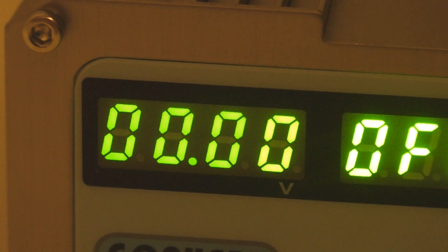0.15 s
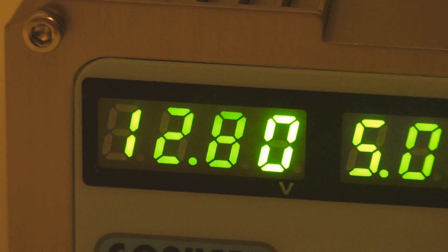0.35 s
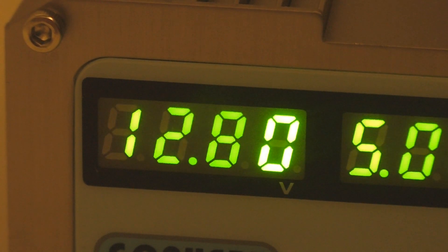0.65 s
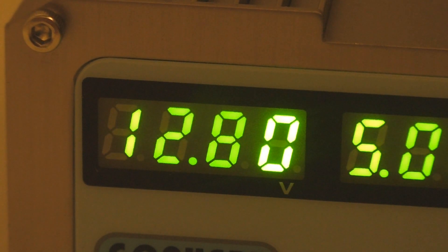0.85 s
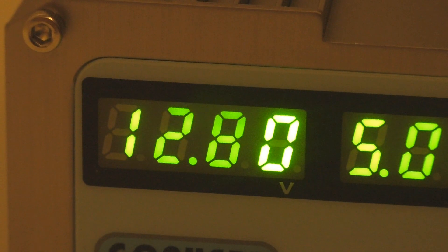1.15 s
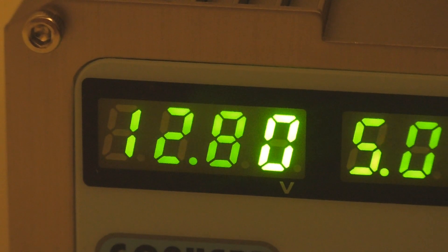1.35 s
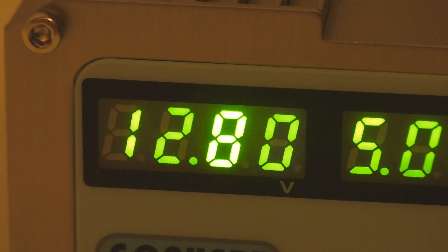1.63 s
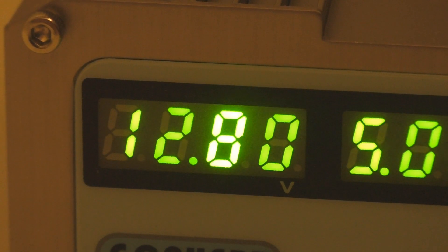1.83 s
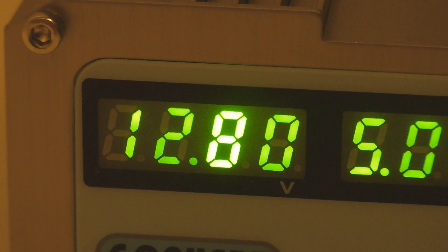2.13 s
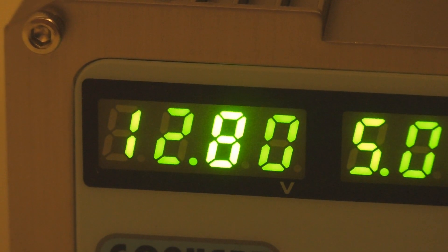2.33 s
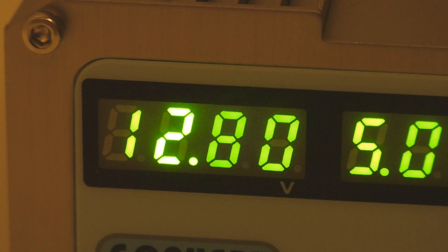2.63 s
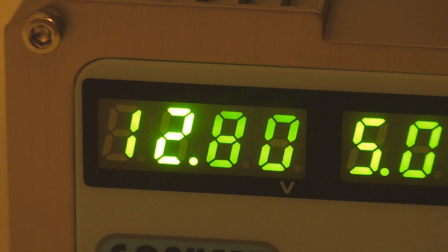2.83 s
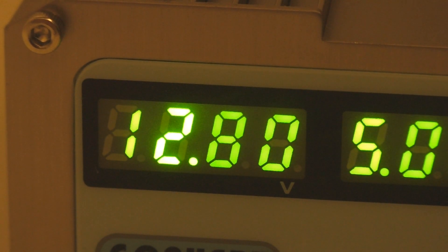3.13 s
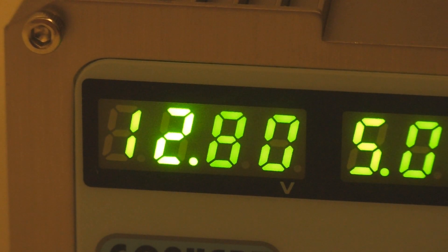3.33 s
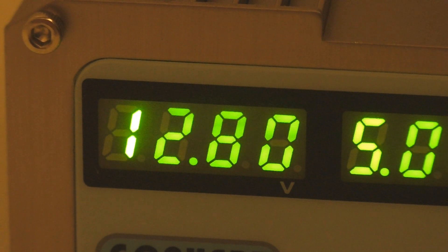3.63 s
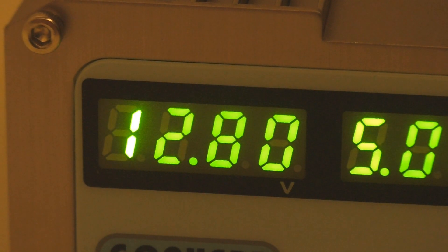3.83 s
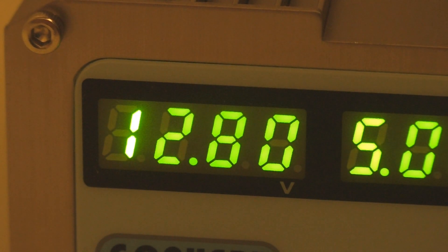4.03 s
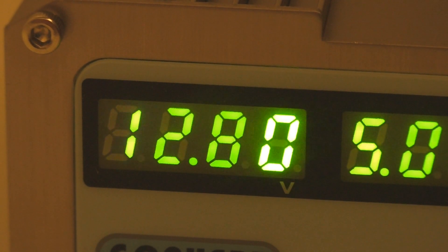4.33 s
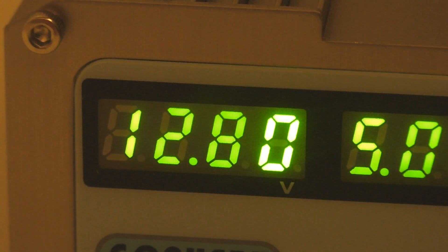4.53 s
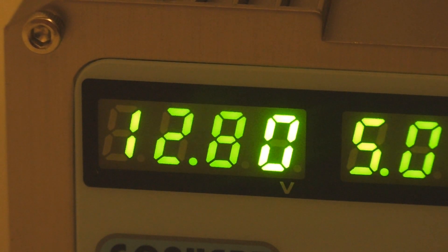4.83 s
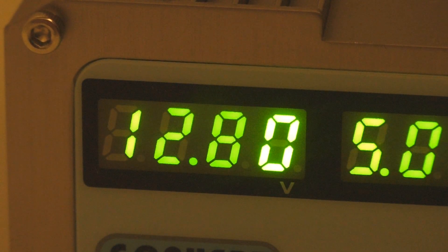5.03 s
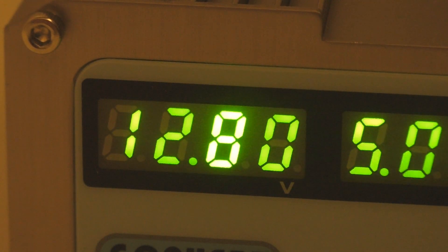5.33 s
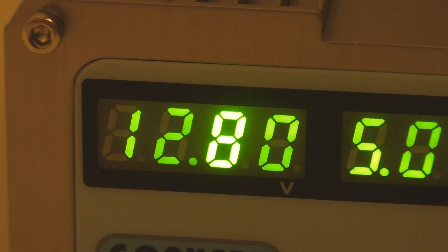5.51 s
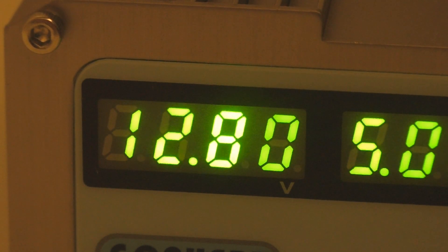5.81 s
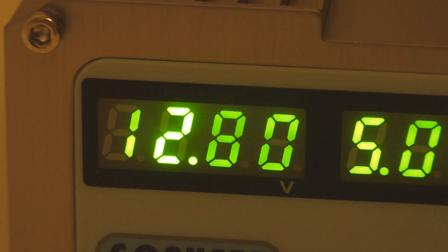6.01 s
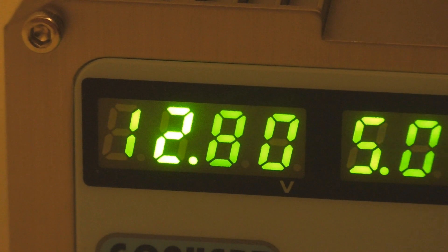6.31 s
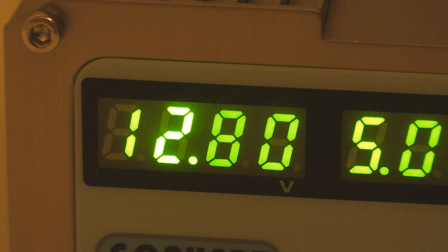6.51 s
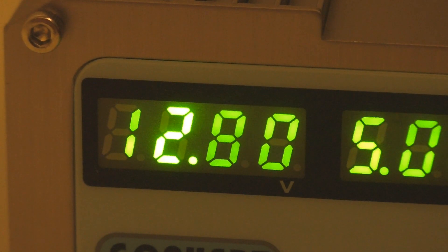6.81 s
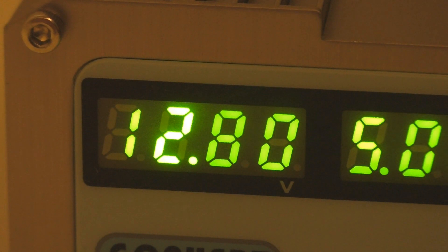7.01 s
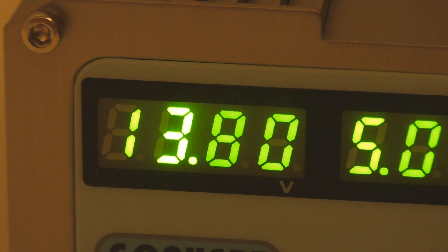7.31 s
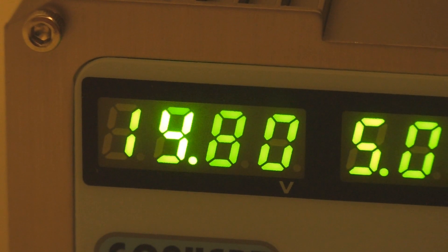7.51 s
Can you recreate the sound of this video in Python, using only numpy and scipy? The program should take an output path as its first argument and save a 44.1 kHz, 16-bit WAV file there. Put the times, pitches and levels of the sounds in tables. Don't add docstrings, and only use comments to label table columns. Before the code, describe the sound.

Seven evenly spaced button presses, each a bright sharp click followed by a softer, duller release knock, close up in a quiet room with faint fan rumble.

```python
import sys
import numpy as np
from scipy import signal
from scipy.fft import rfft, irfft
from scipy.io import wavfile
from scipy.ndimage import uniform_filter1d

SR = 44100
rng = np.random.default_rng(int(sys.argv[2]) if len(sys.argv) > 2 else 0)


def boost_factor(decibels):
    exponent = np.asarray(decibels, float) / 20
    return 10 ** exponent


def transcribe(u):
    v = np.clip(np.atleast_2d(u).T, -1, 1)
    q = np.round(v * 32767).astype(np.int16)
    wavfile.write(sys.argv[1], SR, q)


N = 337850

# f/Hz, density/dB
HISS = [(290, -44), (500, -26.5), (603, -23), (630, -8), (749, -2), (865, -3), (1470, 1), (1800, -2.5),
        (2440, -5.5), (2660, -5.5), (5800, -19.5), (7300, -21.5), (10000, -14), (15700, -13)]
HISS_DB = -63
# f/Hz, likeness/0..1
SIDE_LIKENESS = [(60, 0.74), (130, 0.98), (290, 0.39), (640, 0.97), (1410, 0.11), (3100, 0.086),
                 (6820, 0.51), (11000, 0.62), (15000, 0.25)]
# f/Hz, width/Hz,
# level against the hiss at start/dB, rise/dB per s
NARROW_BANDS = [(590, 30, -3, -1), (744, 40, -1, 0.92), (827, 49, -7.5, 0.26)]
# f/Hz, density/dB
DEEP_AIR = [(15, -0.5), (27, -6), (38, -6), (50, -9), (62, 0.5), (80, -11), (200, -65)]
DEEP_AIR_DB = -62.5
# f/Hz, width/Hz, level/dB
ROOM_BOOMS = [(94.2, 8.6, 2), (121.6, 9.8, 1.5), (144, 35.7, 1), (369, 153, -0.5), (240.4, 75, 0.5),
              (27, 6.4, -8.5)]
CALM_DB = [-62.5, -60.5, -58.5, -65.5, -65.5, -67.5]
WARMING_DB_PER_S = [0.022, 0.096, 0.39, 0.56, 0.39, 0.43]
WAVER_DB = [1.5, 1.16, 1.4, 0.56, 0.9, 1.8]
# t/s, f/Hz, level over calm/dB, length/s
SURGES = [(0.05, 95, 7, 1), (0.493, 95, 8, 0.32), (1.0, 95, 5.5, 0.35), (1.238, 95, 14, 0.24),
          (1.736, 95, 16, 0.16), (4.748, 95, 10, 0.25), (2.58, 95, 6, 0.41), (3.57, 95, 11, 0.26),
          (4.462, 95, 6, .3), (5.2, 95, 14.5, 0.26), (5.72, 95, 6, 0.21), (6.538, 95, 4.5, 0.36),
          (7.212, 95, 8.5, 0.23), (7.602, 95, 8, 0.45), (0.657, 95, 12.5, 0.19), (0.942, 121, 2.5, 0.22),
          (1.41, 121, 8.5, 0.48), (1.924, 121, 11, 0.44), (2.606, 121, 14.5, 0.27), (3.065, 121, 7.5, 0.52),
          (3.485, 121, 6.5, 0.15), (3.803, 121, 10, 0.37), (4.512, 121, 10.5, 0.54),
          (5.248, 121, 11.5, 0.32), (5.66, 121, 13, 0.56), (6.115, 121, 8.5, 0.53), (6.65, 121, 12, 0.73),
          (7.36, 121, 2, 0.36), (1.277, 146, 5, 0.33), (2.438, 146, 8, 0.18), (2.8, 146, 2.5, .45),
          (5.4, 369, -1.5, .3), (5.4, 241, -1, 0.27), (4.7, 146, 6, 0.65), (5.9, 146, 3.5, 0.34),
          (6.4, 146, 3.5, .4), (3.3, 146, -2, .4), (0.1, 146, 1, .3), (0.75, 241, 3.5, 0.37),
          (4.7, 241, 4, 0.45), (6.298, 241, 4, 0.37), (7.0, 241, -2.5, 0.36), (6.3, 369, 2, 0.68),
          (7.05, 369, -2.5, .5), (4.5, 369, 0.5, .4), (3.3, 121, 0, .25)]
# t/s, length/s, f/Hz, peak level/dB
SQUEAKS = [
    (5.81, 0.057, 9260, -65),
    (5.84, .08, 9400, -81),
    (7.539, 0.11, 8660, -60),
    (7.59, 0.056, 9260, -71),
    (7.625, 0.035, 8700, -70),
]
# length/s, level/dB, low f/Hz, high f/Hz
SCRAPE = (0.14, -66, 1200, 4500)
SCRAPE_S = 6.09
# f/Hz, t60/s, level/dB, build-up/s
FLICK_MODES = [(1567, .052, -5, .0005), (2213, 0.042, 2, .0005), (3203, 0.092, -11, .004),
               (3500, 0.034, -1, .0005), (4870, .03, -12, .0005)]
FLICK_S, FLICK_DB = 5.9807, -43.5
# f/Hz, t60/s, level/dB, build-up/s
DETENT_MODES = [(980, 0.092, -9, .002), (1510, 0.16, -2, .002), (2080, .07, 1, .001),
                (2850, 0.076, 1, .001), (3200, 0.078, -3, .001), (4430, 0.098, -6, .0006),
                (5900, 0.071, -5, .0004), (7500, 0.051, -6, .0004), (7876, .052, -7, .0004),
                (9600, .03, -7, .0004), (12000, .025, -8, .0004)]
DETENT_S, DETENT_DB = 6.2142, -51.5
# t/s, f/Hz, level/dB, t60/s
THUDS = [(2, 179, -45, 0.16), (1.22, 249, -45.5, 0.15), (1.39, 205, -42.5, 0.15), (5.375, 195, -42, .12),
         (5.543, 196, -48, .12), (6.16, 252, -45.5, 0.22), (5.4, 312, -43, 0.12), (5.3, 403, -47, 0.087),
         (6.64, 760, -60, .15), (7.61, 300, -49, 0.15), (4.94, 97, -42, 0.34), (1.55, 94, -48, .25),
         (4.62, 140, -44.5, 0.34), (5.521, 180, -45, .15), (2.19, 100, -45, 0.25), (1.53, 98, -37, 0.2),
         (7.2, 220, -51, 0.24), (7.4, 250, -53, 0.18)]
TICK_S = [1.591, 1.592, 1.593, 1.593, 1.87, 3.15, 3.613, 5.981, 5.982, 5.982, 6.005, 6.075, 6.079, 6.157,
          6.158, 6.162, 6.166, 6.19, 6.2142, 6.215, 6.222, 6.232, 7.129, 7.18, 7.2365]
# peak level/dB, low f/Hz, high f/Hz, t60/s
TICKS = [(-60, 3400, 4900, .07), (-51, 860, 1700, .072), (-64, 7000, 8200, .09), (-67, 5200, 5800, .07),
         (-61.5, 1700, 2300, 0.16), (-67, 3000, 8000, .08), (-65, 3000, 4000, .05), (-60, 900, 6800, .1),
         (-53, 1900, 2430, .1), (-53, 3100, 3900, .1), (-62, 2000, 4500, .06), (-67, 7560, 12000, .066),
         (-64, 1500, 4500, .045), (-61, 3500, 13000, .23), (-58, 1100, 2600, .15), (-61, 8000, 13000, .08),
         (-63, 2500, 5000, .09), (-59, 3200, 13000, .11), (-50, 1200, 3980, .12), (-50.5, 3700, 11400, .09),
         (-57, 2000, 6000, .06), (-59, 1800, 5500, .09), (-64, 1200, 2000, .06), (-63, 1400, 3000, .05),
         (-56, 1300, 2100, .06)]
# delay/s, level/dB, low f/Hz, high f/Hz
ECHOES = [(0.0113, -16, 1850, 2700), (0.0108, -30, 4600, 6500), (0.0155, -21.5, 2400, 4500),
          (0.0215, -30, 1040, 1400), (0.029, -34, 910, 2700)]
# f/Hz, t60/s
TAIL_T60 = [(200, 0.29), (600, 0.14), (1500, 0.19), (4000, 0.16), (10000, 0.033)]

# t/s, peak level/dB
PRESSES = [(0.21198, -13), (1.50936, -12.2), (2.43441, -13.3), (3.3092, -12.5), (4.21068, -13),
           (4.92093, -12.6), (5.66695, -12.8)]
# buzz level/dB, crackle level/dB
SHAKES = [(-2, -0.5), (-4, 1.5), (2, 0), (1, -2.5), (5, -0.5), (0.5, -1.5), (1.5, 0.5)]
# f/Hz, t60/s, left and right swing/thousandths (sign = first direction)
SNAP_MODES = [(245, 0.22, -5.1, -5.2), (394, 0.22, 6.3, 9.1), (454, 0.22, -9.8, -9.2),
              (504, 0.033, 9.9, 15.1), (692, 0.042, 25.9, 33.1), (1090, 0.041, 56.7, 50.6),
              (1151, 0.105, -19.6, -10.0), (1218, 0.22, -3.4, -4.3), (1310, 0.215, -11.4, -5.6),
              (1340, 0.03, -232.5, -185.7), (1455, 0.055, -34.3, -14.4), (1543, 0.139, 11.8, 13.2),
              (1627, 0.01, 463.7, 388.0), (1758, 0.01, -301.8, -239.3), (1904, 0.074, -29.4, -22.7),
              (2049, 0.153, -4.9, -4.7), (2249, 0.019, -108.8, -116.5), (2397, 0.123, 7.4, 7.7),
              (2534, 0.105, -3.6, -9.7), (2624, 0.076, -19.0, -13.6), (2872, 0.019, -16.9, -13.6),
              (2971, 0.136, 1.5, 2.3), (3157, 0.034, 3.9, 14.2), (3295, 0.03, 25.5, 16.4),
              (3357, 0.042, -19.8, -12.0), (3710, 0.023, -9.1, -5.1), (3963, 0.015, -15.7, -19.8),
              (4362, 0.09, -2.0, -2.2), (4770, 0.128, 0.7, 0.7), (5014, 0.22, 0.4, 0.4)]
SNAP_RISE_S = 0.000082
# f/Hz, t60/s, level under the snap/dB, build-up/s
BENCH_MODES = [(243.8, 0.14, -22, 0.0039), (459, 0.1, -27.5, 0.011), (296, 0.16, -29, 0.015),
               (376.3, 0.11, -21, 0.0057), (630, 0.058, -26.5, 0.0021), (1275, 0.12, -29, .006),
               (1520, 0.064, -34, 0.0066), (1110, 0.37, -44, .02), (1690, 0.32, -41, .015),
               (2394, 0.09, -35, 0.0056), (3308, 0.063, -35.5, 0.0047), (5300, 0.048, -37.5, 0.001)]
# f/Hz, width/Hz, t60/s, level/dB, build-up/s
SNAP_BUZZ = [(2310, 250, 0.11, -27.5, .006), (3310, 170, .13, -36, 0.0044), (4820, 130, 0.16, -41, .007),
             (5120, 150, 0.13, -44, .008), (2900, 250, .08, -36, .004), (1950, 270, 0.083, -31, .008),
             (1360, 210, .15, -35, .006)]
# f/Hz, density/dB
TOUCH_COLOUR = [(2500, -19), (4000, -6), (6000, -0.5), (9000, -2.5), (12000, -3), (15000, -15)]
TOUCH_LEAD_S, TOUCH_DB = .00045, -34
# f/Hz, density/dB
SNAP_CRACKLE = [(3060, -1.5), (3500, 0.5), (3800, -4), (4300, 0.5), (5200, -4.5), (5700, -7.5), (7260, -7),
                (9000, -9.5), (11500, -12), (14300, -27), (16000, -25)]
SNAP_CRACKLE_DB = -37.5
# f/Hz, density/dB
SNAP_TAIL = [(350, -10.5), (600, 1), (791, -12), (1200, 0), (1590, 1), (1920, -4.5), (2380, -2.5),
             (2910, -25), (3260, -12), (5660, -21), (12000, -32), (15600, -70), (22000, -120)]

RELEASE_S = [0.40811, 1.71114, 2.64848, 3.55191, 4.40916, 5.14734, 5.93071]
# peak/dB, sharpness of 1.2 kHz modes/dB, edge of 1.9 kHz modes/dB, thump/dB, crackle/dB
RELEASES = [(-26, -5.5, 1, -15.5, -42.5), (-26.5, -10, -0.5, -16, -53), (-27.5, -15.5, 3, -15.5, -49.5),
            (-28, -13.5, 0, -13.5, -55), (-27, -13, 1, -14, -55), (-27, -6, 0.2, -17, -55),
            (-27, -15.5, 2, -15.5, -55.5)]
CAP_DB = [-46, -59, -48, -57, -58, -52, -57]
# f/Hz, t60/s, left and right swing/thousandths (sign = first direction)
KNOCK_MODES = [(90, 0.22, 12.6, 12.3), (145, 0.22, -9.3, -7.9), (235, 0.123, -19.7, -20.3),
               (296, 0.22, 7.2, 7.8), (379, 0.059, 45.7, 52.0), (450, 0.22, -12.1, -9.6),
               (521, 0.22, 2.8, 2.0), (665, 0.083, 12.8, 14.8), (693, 0.056, 26.4, 28.2),
               (779, 0.013, 10.6, 6.3), (910, 0.151, 1.2, 1.9), (1084, 0.078, 7.5, 10.0),
               (1114, 0.064, 12.9, 9.0), (1158, 0.209, -1.6, -0.7), (1308, 0.049, 22.5, 14.4),
               (1380, 0.035, -18.3, -12.1), (1617, 0.026, 37.5, 22.2), (1691, 0.22, -0.9, -0.7),
               (1715, 0.009, -75.8, -53.9), (1918, 0.091, 3.8, 4.3), (1980, 0.022, 11.1, 8.1),
               (2206, 0.009, -19.9, -21.4), (2281, 0.016, 13.9, 12.2), (2622, 0.022, 4.0, 4.5),
               (2883, 0.08, -1.0, -0.6), (3295, 0.22, 0.2, 0.4)]
# f/Hz, t60/s, level/dB, build-up/s
THUMP_MODES = [(61.6, 0.32, -9, 0.017), (87.2, 0.26, -3.5, 0.03), (243.5, 0.48, -20, 0.022),
               (390.5, 0.16, 6.5, 0.018), (693, 0.12, -15, 0.026), (457, 0.07, 11.5, 0.0072)]
# f/Hz, t60/s, level/dB, build-up/s
CAP_MODES = [(2390, 0.06, -3, 0.0019), (3300, 0.09, -2, 0.004)]
# f/Hz, width/Hz, t60/s, level/dB, build-up/s
CAP_BUZZ = [(2730, 310, 0.055, -2, 0.0033), (3360, 200, .12, -1, .008), (4100, 460, .05, -2, .002)]
# f/Hz, width/Hz, t60/s, level/dB, build-up/s
THUMP_BUZZ = [(302, 80, 0.13, -21, .007), (560, 110, .08, -20, 0.0052), (100, 50, 0.24, -19.5, 0.013)]
# f/Hz, density/dB
KNOCK_CRACKLE = [(1290, -16), (2200, 0), (2990, -7.5), (3400, -7.5), (3780, -12), (5500, -21), (7150, -39),
                 (12100, -120)]
# f/Hz, density/dB
KNOCK_RATTLE = [(3240, -40), (5500, -8), (6610, 1.5), (7160, -3), (10600, -1), (16000, -27)]
RATTLE_DB, RATTLE_GROWTH = 29.5, 1.682
# f/Hz, density/dB
KNOCK_TAIL = [(88, -34), (150, -3), (450, 0), (753, -6), (805, -28), (1090, -6), (1370, -19), (1570, -12.5),
              (3980, -41), (8000, -49), (10400, -81), (17600, -120)]

EDGE_HZ, CLICK_EDGE_HZ = 15740, 16600


def evened(x):
    return x / np.sqrt(np.mean(x ** 2) + 1e-20)


def read(points, hz):
    f, value = np.transpose(points)
    return np.interp(np.log(hz + 1), np.log(f + 1), value)


def add(mix, s, sound):
    part = mix[:, round(s * SR):][:, :sound.shape[1]]
    part += sound[:, :part.shape[1]]


def pair(length, same):
    a, b = rng.standard_normal((2, length))
    same = np.clip(same, 0, 1)
    return np.array([a, same * a + np.sqrt(1 - same ** 2) * b])


def colour(x, points):
    size = x.shape[-1]
    gain = boost_factor(read(points, np.fft.rfftfreq(size, 1 / SR)))
    return irfft(rfft(x) * gain, size)


def band_pass(x, order, low_hz, high_hz):
    band = signal.butter(N=order, Wn=[low_hz, high_hz], btype="band", fs=SR, output="sos")
    return signal.sosfilt(band, x)


def resonate(x, hz, width):
    turn = np.exp(2j * np.pi * hz * np.arange(x.shape[-1]) / SR)
    r = np.exp(-np.pi * width / SR)
    return 2 * (turn * signal.lfilter([1 - r], [1, -r], x / turn)).real


def hiss():
    frames, hz = N // 256 + 5, np.fft.rfftfreq(1024, 1 / SR)
    a, b, c, d, patches = rng.standard_normal((frames, 513, 5)).T
    patches = evened(uniform_filter1d(uniform_filter1d(patches, 14, 0), 16, 1))
    same = np.clip(read(SIDE_LIKENESS, hz), -1, 1)[:, None]
    left = a + 1j * b
    right = same * left + np.sqrt(1 - same ** 2) * (c + 1j * d)
    t = np.arange(frames) * 256 / SR
    narrow_db = sum((db + db_per_s * t) * np.exp(-((hz[:, None] - f) / width) ** 2)
                   for f, width, db, db_per_s in NARROW_BANDS)
    gain = boost_factor(read(HISS, hz)[:, None] + narrow_db + 0.77 * patches) * (hz < EDGE_HZ)[:, None]
    wash = signal.istft(np.array([left, right]) * gain, nperseg=1024, noverlap=768)[1][:, :N]
    return boost_factor(HISS_DB) * wash / wash.mean(0).std()


def boom(hz, width, same):
    x = evened(resonate(resonate(pair(N, same), hz, width), hz, 2 * width))
    power = uniform_filter1d(x.mean(0) ** 2, round(4 * SR / hz))
    return evened(x / (power + 0.044) ** 0.24)


def waver():
    t = np.arange(N // 256 + 2) * 256 / SR
    slow = sum(np.sin(2 * np.pi * (f * t + rng.random())) / np.sqrt(f)
               for f in np.geomspace(.5, 5.5, num=20))
    return np.interp(np.arange(N) / SR, t, evened(slow))


def rumble():
    t, booms_hz = np.arange(N) / SR, np.array(ROOM_BOOMS)[:, 0]
    surge_db = np.zeros((len(ROOM_BOOMS), N))
    for s, hz, db, length in SURGES:
        nearest = abs(booms_hz - hz).argmin()
        surge_db[nearest] += db * np.cos(np.pi * np.clip((t - s) / length, -.5, .5))
    alike = np.clip(read(SIDE_LIKENESS, booms_hz) + 0.018, 0, 1)
    mix = boost_factor(DEEP_AIR_DB) * evened(colour(pair(N, 0.85), DEEP_AIR))
    for k, (hz, width, db) in enumerate(ROOM_BOOMS):
        swell_db = CALM_DB[k] + WARMING_DB_PER_S[k] * t + surge_db[k] + WAVER_DB[k] * waver()
        mix += boost_factor(swell_db + db) * boom(hz, width, alike[k])
    return mix


def squeaks():
    mix = np.zeros((2, N))
    for s, length, hz, db in SQUEAKS:
        size = round(length * SR)
        tone = np.sin(2 * np.pi * hz * np.arange(size) / SR)
        fuzz = evened(resonate(pair(size, 0.59), hz, 90))
        add(mix, s, boost_factor(db) * (tone + 0.64 * fuzz) * np.hanning(size))
    return mix


def scrape():
    length, db, low_hz, high_hz = SCRAPE
    size, mix = round(length * SR), np.zeros((2, N))
    grain_db = 2.5 * np.minimum(rng.exponential(1, size), 3)
    grains = pair(size, 0.68) * boost_factor(grain_db) * (rng.random(size) < .15)
    add(mix, SCRAPE_S, boost_factor(db) * evened(band_pass(grains, 2, low_hz, high_hz)) * np.hanning(size))
    return mix


def bench(db, modes):
    t = np.arange(9000) / SR
    sound = sum(boost_factor(d - 60 * t / t60) * (1 - np.exp(-t / up)) * np.sin(2 * np.pi * hz * t)
                for hz, t60, d, up in modes)
    return boost_factor(db) * sound * np.ones((2, 1))


def taps():
    mix = np.zeros((2, N))
    add(mix, FLICK_S, bench(FLICK_DB, FLICK_MODES))
    add(mix, DETENT_S, bench(DETENT_DB, DETENT_MODES))
    for s, hz, db, t60 in THUDS:
        add(mix, s, bench(db, [(hz, t60, 0, .008)]))
    return mix


def knob():
    mix, t = np.zeros((2, N)), np.arange(6000) / SR
    for s, (db, low_hz, high_hz, t60) in zip(TICK_S, TICKS):
        burst = evened(band_pass(pair(7000, .8), 3, low_hz, high_hz)[:, 1000:])
        fade = boost_factor(-60 * t / t60) + boost_factor(2.0 - 60 * t / 0.008)
        add(mix, s, boost_factor(db) * burst * fade * (1 - np.exp(-t / 0.00034)))
    return mix


def ring(modes, lags, sharp_db, edge_db, wobble):
    hz, t60, left, right = np.transpose(modes)
    hz = hz * (1 + wobble * rng.standard_normal(len(hz)))
    sharpness = sharp_db * np.exp(-((hz - 1220) / 260) ** 4)
    edge = edge_db * np.exp(-((hz - 1950) / 450) ** 4)
    t = np.maximum(np.arange(7000)[:, None] / SR - np.array([0 * lags, lags])[:, None], 0)
    waves = np.sin(2 * np.pi * hz * t) * boost_factor(-60 * t / t60) * boost_factor(sharpness + edge)
    sound = np.array([waves[0] @ left, waves[1] @ right])
    return sound / abs(sound.mean(0)).max()


def echoes(blow):
    out = np.pad(blow, ((0, 0), (0, 2000)))
    for delay, echo_db, low_hz, high_hz in ECHOES:
        add(out, delay, boost_factor(echo_db) * band_pass(blow[::-1, :2000], 2, low_hz, high_hz))
    return out


def buzz(db, bands):
    t = np.arange(5000) / SR
    sound = np.zeros((2, 5000))
    for hz, width, t60, d, up in bands:
        shape = boost_factor(d - 60 * t / t60) * (1 - np.exp(-(t / up) ** 2))
        sound += shape * evened(resonate(pair(5000, 0.62), hz, width))
    return boost_factor(db) * sound


def crackle(db, spectrum, t60, rise, noise):
    t = np.arange(noise.shape[1]) / SR
    fade = boost_factor(-60 * t / t60) + boost_factor(-12.5 - 60 * t / 0.17)
    return boost_factor(db) * evened(colour(noise, spectrum)) * fade * (1 - np.exp(-(t / rise) ** 2))


def tail(noise, spectrum):
    hz, t, z = signal.stft(colour(noise, spectrum), SR, nperseg=256)
    fade = boost_factor(-60 * t / read(TAIL_T60, hz)[:, None])
    echo = signal.istft(z * fade, SR, nperseg=256)[1]
    return evened(echo) * (1 - np.exp(-(np.arange(echo.shape[1]) / SR / 0.0054) ** 2))


def presses(mix, lags, room, rattle):
    loading = 1 - np.exp(-np.arange(7000) / SR / SNAP_RISE_S)
    for (edge, db), (buzz_db, crackle_db) in zip(PRESSES, SHAKES):
        s = edge - .0004
        touch = crackle(TOUCH_DB, TOUCH_COLOUR, 0.004, .00005, pair(1000, 0.99))
        snap = boost_factor(db + 3.5) * ring(SNAP_MODES, lags, 0, 0, wobble=0.0019) * loading
        metal = rattle + 0.89 * pair(6000, 0.71)
        add(mix, s - TOUCH_LEAD_S, touch * np.hanning(2000)[1000:])
        add(mix, s, echoes(snap))
        add(mix, s, bench(db + 2.5, BENCH_MODES))
        add(mix, s, buzz(db + buzz_db, SNAP_BUZZ))
        add(mix, s, crackle(SNAP_CRACKLE_DB + crackle_db, SNAP_CRACKLE, 0.024, .0001, metal))
        add(mix, s, boost_factor(db - 35.0) * tail(room + 0.14 * pair(12000, 0.3), SNAP_TAIL))


def releases(mix, lags, room):
    relaxing = -np.hanning(50) * np.ones((2, 1))
    for s, release, cap_db in zip(RELEASE_S, RELEASES, CAP_DB):
        db, sharp_db, edge_db, thump_db, crackle_db = release
        stop = s + .0013
        knock = ring(KNOCK_MODES, lags[:len(KNOCK_MODES)], sharp_db + 12.0, edge_db, wobble=0.0033)
        rattle_db = RATTLE_DB + RATTLE_GROWTH * crackle_db
        add(mix, s + .0004, boost_factor(db - 3) * relaxing)
        add(mix, stop, echoes(boost_factor(db + 7.5) * knock))
        add(mix, stop, bench(db + thump_db + 2.5, THUMP_MODES))
        add(mix, stop, bench(cap_db, CAP_MODES))
        add(mix, stop, buzz(cap_db, CAP_BUZZ))
        add(mix, stop, buzz(db, THUMP_BUZZ))
        add(mix, stop, crackle(crackle_db + 7.5, KNOCK_CRACKLE, 0.057, 0.00076, pair(6000, 0.63)))
        add(mix, stop, crackle(rattle_db, KNOCK_RATTLE, 0.048, 0.0014, pair(6000, 0.86)))
        add(mix, stop, boost_factor(db - 23) * tail(room[::-1] + 0.42 * pair(12000, 0.51), KNOCK_TAIL))


def switch():
    mix, room, rattle = np.zeros((2, N)), pair(12000, 0.74), pair(6000, 0.93)
    lags = 4e-5 * rng.random(30)
    presses(mix, lags, room, rattle)
    releases(mix, lags, room)
    return mix


def scene():
    return hiss() + rumble() + squeaks() + scrape() + taps() + knob() + switch()


def top_cut(x):
    return signal.sosfilt(signal.butter(12, 16510, fs=SR, output="sos"), x)


def record(dry):
    edge, top = (signal.firwin(1023, hz, window=("kaiser", 9), fs=SR) for hz in (EDGE_HZ, CLICK_EDGE_HZ))
    leaky = edge + boost_factor(-20) * (top - edge)
    limited = signal.oaconvolve(dry, leaky[None], "same", axes=1)
    return top_cut(limited)


dry = scene()
out = record(dry)
transcribe(out)
```